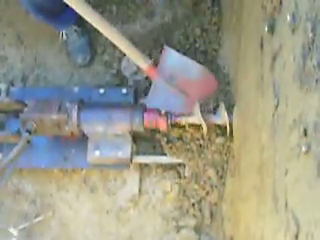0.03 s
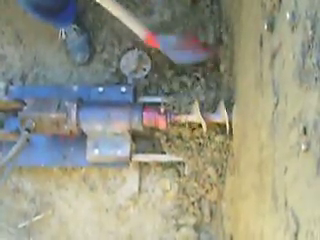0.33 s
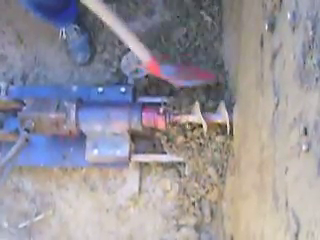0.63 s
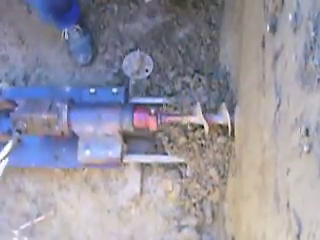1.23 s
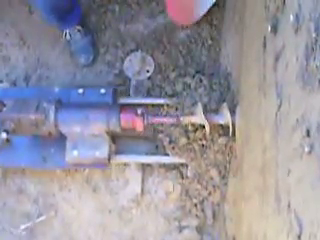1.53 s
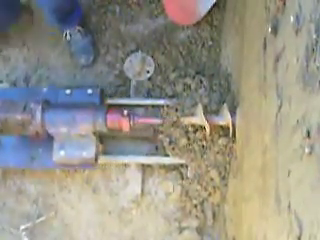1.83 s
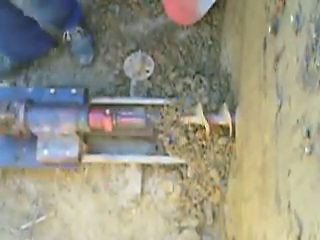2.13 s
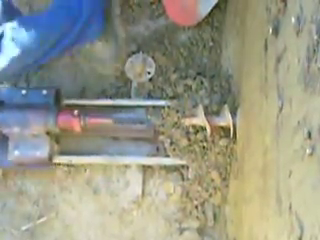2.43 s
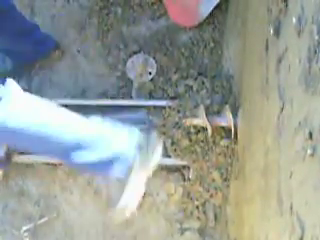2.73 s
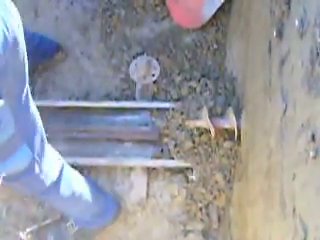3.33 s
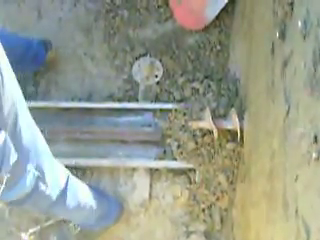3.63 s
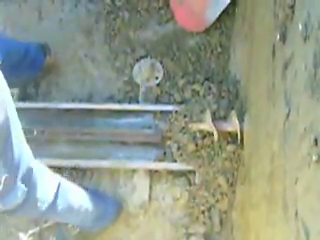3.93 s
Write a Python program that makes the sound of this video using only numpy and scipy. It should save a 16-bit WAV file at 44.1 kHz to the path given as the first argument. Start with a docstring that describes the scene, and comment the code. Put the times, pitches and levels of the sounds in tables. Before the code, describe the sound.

A steel carriage scrapes along gritty rails while a small engine thuds steadily underneath. Sharp, gritty knocks, probably from a shovel and the rig, ring the metal frame from the start, thinning out by 2 seconds. Jerky scraping begins around 1 second and swells from 2.5 into one loud grind. A rough, wavering moan joins from 3 seconds until the end at 4, overloading the close, dull microphone.

```python
"""A small engine thuds steadily beside a boring rig in an earth pit. Gritty knocks, probably of a
shovel and the rig's own parts, ring its steel frame. Then its carriage is drawn back along soil-covered
rails, first in jerks, then in one loud grinding scrape with a stick-slip moan.
The scrape overloads the close, narrow-band microphone."""
import sys
import numpy as np
from scipy import signal
from scipy.fft import rfft, irfft
from scipy.io import wavfile
from scipy.ndimage import uniform_filter1d

SR = 44100
rng = np.random.default_rng(int(sys.argv[2]) if len(sys.argv) > 2 else 0)


def pcm_store(signal):
    """Save signal as 16-bit PCM."""
    levels = np.round(np.clip(np.atleast_2d(signal), -1, 1) * 32767)
    wavfile.write(sys.argv[1], SR, levels.astype(np.int16).T)


N = 176400

# frame registers: low_hz, high_hz
HUM_HZ, GROAN_HZ, CLANG_HZ, GRIT_HZ = (222, 367), (410.4, 736), (774, 1373), (1370, 4360)


def undb(db):
    """Decibels to gain."""
    return 10 ** (np.asarray(db) / 20)


def curve(rows, column=1):
    """Table column, interpolated linearly in time."""
    rows = np.array(rows)
    return np.interp(np.arange(N) / SR, rows[:, 0], rows[:, column])


def walk(rate_hz):
    """Smooth random wander, spread 1."""
    step = int(SR / rate_hz)
    y = uniform_filter1d(np.repeat(rng.standard_normal(N)[:N // step + 1], step), step)[:N]
    return y / y.std()


def coloured(spectrum):
    """Noise of the given spectral shape, rms 1."""
    hz, db = np.array(spectrum).T
    bins_hz = np.fft.rfftfreq(N, 1 / SR)
    gain = undb(np.interp(np.log(bins_hz + 1), np.log(hz), db))
    y = irfft(rfft(rng.standard_normal(N)) * gain, N)
    return y / y.std()


def band(x, edges_hz):
    """Band-pass between two edges."""
    return signal.sosfilt(signal.butter(4, edges_hz, "band", fs=SR, output="sos"), x)


def engine():
    """Low exhaust thud and drone, with mechanical clatter that swells twice a cycle."""
    # engine speed: time_s, cycle_hz
    speed = [(0, 34.6), (.22, 32.2), (.55, 31.75), (1.5, 31.25), (1.95, 30.5), (2.55, 32.2), (3.1, 30.85),
             (3.65, 30.3), (4, 32)]
    # exhaust envelope: time_s, gain_db
    exhaust = [(0, -1.5), (1, -4), (2.7, -3), (2.95, -8.5), (3.35, -8.5), (3.7, -3), (4, -4.5)]
    # exhaust partials: cycle_multiple, level_db
    partials = [(1, -35.5), (2, -27.5), (3, -37.5), (4, -45.5), (6, -57.5), (7, -52), (8, -56), (9, -48),
                (10, -48)]
    # clatter spectrum: freq_hz, relative_db
    clatter_shape = [(30, 3), (110, -4.5), (300, -3), (390, -5), (520, -8), (780, -14), (1000, -6),
                     (1300, -27), (2700, -20.5), (4200, -24.5)]
    # drone at five times the cycle rate: time_s, rms_db
    drone_levels = [(0, -45.5), (.8, -46.5), (1.3, -39), (1.75, -38), (2.08, -45), (2.35, -36.5),
                    (2.75, -40), (3.2, -46.5), (4, -45)]
    waver_db, clatter_db, clatter_depth = 2.6, -35.5, 0.44
    phase = 2 * np.pi * np.cumsum(curve(speed)) / SR
    thud = sum(np.sqrt(2) * undb(db + waver_db * walk(5)) * np.cos(k * phase) for k, db in partials)
    clatter = coloured(clatter_shape) * (1 + clatter_depth * np.cos(2 * phase))
    drone = np.sqrt(2) * undb(curve(drone_levels)) * np.cos(5 * phase)
    return thud * undb(curve(exhaust)) + drone + undb(clatter_db) * clatter


def frame(force, edges_hz, struck):
    """The steel rings in one register, struck or rubbed; white force keeps its rms."""
    # frame and rail resonances: pitch_hz, width_hz, rubbed_db, struck_db
    modes = [(291.8, 16.7, 0, 0), (461, 71, -4, -1), (504.3, 36, -1.5, 1.5), (552.5, 35, 1, 1),
             (657, 110, -1.5, -2), (842, 140, -0.5, -14.5), (927, 77, 3, -4), (1041, 72, 1.5, 3.5),
             (1160, 69, -2.5, -12.5), (1424, 60, 0, -3), (1581, 210, 3, 1), (1841, 290, -7.5, -4),
             (2177, 210, -2, -0.5), (2496, 120, 1, 0), (2765, 325, 0.5, 3), (2960, 97, -6.5, 2.5),
             (3145, 130, -6, 0), (3380, 140, -4.5, 1), (3697, 280, -0.5, 4.5), (4120, 140, -11.5, -1.5)]
    t = np.arange(SR // 4) / SR
    ring = np.zeros(len(t))
    for pitch_hz, width_hz, rubbed_db, struck_db in modes:
        if edges_hz[0] < pitch_hz < edges_hz[1]:
            gain = undb(struck_db if struck else rubbed_db) * width_hz
            ring += gain * np.exp(-np.pi * width_hz * t) * np.cos(2 * np.pi * pitch_hz * t)
    ring = band(ring, edges_hz)
    return signal.fftconvolve(force, ring / np.linalg.norm(ring))[:N]


def knocks():
    """Each blow bites through soil, crushes grit, rings the frame and lets crumbs settle."""
    # blows on the frame: start_s, hum_db, groan_db, clang_db, grit_db, decay_s
    blows = [(.001, -30, -28, -27.5, -30, 0.032), (0.033, -33, -9, -8, -29, 0.0037),
             (.236, -48, -36, -24.5, -31.5, 0.016), (0.284, -34, -30.5, -32.5, -28.5, 0.036),
             (0.309, -44, -28, -27, -24, 0.024), (.329, -31, -15.5, -11.5, -15, 0.011),
             (0.363, -40, -36, -27, -24, 0.0073), (0.388, -39, -28, -28, -20.5, 0.0094),
             (0.4545, -15, -15, -12.5, -8.5, 0.011), (0.474, -24, -24.5, -21.5, -31, 0.012),
             (0.571, -40, -34, -34, -29, .012), (.597, -34, -36, -38, -28, 0.0066),
             (.642, -14, -11, -12, -11, 0.0083), (0.693, -42, -37, -36.5, -33, 0.033),
             (.745, -39, -33.5, -46, -31, .015), (.766, -50, -35, -34, -32.5, 0.015),
             (0.794, -36, -24, -18.5, -19.5, 0.0078), (0.84, -24, -15.5, -12.5, -7, 0.0039),
             (0.883, -28, -25, -27, -19.5, 0.0092), (0.922, -24, -20.5, -23.5, -15.5, 0.0068),
             (0.938, -23, -34, -30.5, -24, .014), (1.003, -30, -31, -30, -28, 0.012),
             (1.037, -34, -37, -32, -30, 0.031), (1.2306, -51, -44, -27, -22, 0.011),
             (1.2942, -19, -18, -25, -14.5, 0.0077), (1.3468, -37, -29, -19.5, -21.5, 0.0086),
             (1.375, -24, -15.5, -18, -13.5, 0.0067), (1.4208, -36, -29, -19.5, -19, 0.035),
             (1.4865, -25, -26, -26, -14.5, 0.011), (1.5447, -33, -28, -34, -26, 0.014),
             (1.6292, -23, -35, -19.5, -23, 0.008), (1.7177, -41, -27, -20.5, -20, 0.0078),
             (1.826, -20, -26, -22.5, -21, 0.016), (1.9076, -43, -39, -32, -22.5, 0.0067),
             (1.939, -47, -33.5, -24.5, -22.5, 0.012), (2.055, -33, -17, -32, -28, 0.0077),
             (2.111, -51, -21.5, -21, -23, .012), (2.1331, -30.5, -26.5, -23, -22.5, 0.0061),
             (2.4135, -33.5, -23.5, -29, -14.5, 0.0049)]
    attack_s, contact_s = 0.0015, 0.0013
    settle_db, settle_s = -26.5, 0.036
    registers = (HUM_HZ, GROAN_HZ, CLANG_HZ, GRIT_HZ)
    envelopes = np.zeros((len(registers), N))
    age_s = np.arange(SR // 4) / SR
    bite = 1 - np.exp(-age_s / attack_s)
    crumbs = undb(settle_db) * np.exp(-age_s / settle_s)
    for start_s, *levels_db, decay_s in blows:
        first = int(start_s * SR)
        crush = np.exp(-np.maximum(age_s - contact_s, 0) / decay_s)
        envelopes[:, first:first + len(age_s)] += undb(levels_db)[:, None] * (crush + crumbs) * bite
    return sum(frame(envelope * rng.choice([-1, 1], N), edges_hz, struck=True)
               for envelope, edges_hz in zip(envelopes, registers))


def grains(rate_hz=5000, spread_db=3):
    """Soil crushed under steel: dense clicks of uneven size, rms 1."""
    clicks = (rng.random(N) < rate_hz / SR) * rng.choice([-1, 1], N)
    y = clicks * undb(spread_db * np.minimum(rng.exponential(size=N), 4))
    return y / y.std()


def chatter(half_width_hz=34):
    """Steel sticks and slips on the rails: a rough, narrow moan of wandering pitch."""
    # stick-slip moan: time_s, pitch_hz, level_db
    slip = [(3.05, 560, -29), (3.17, 528, -23), (3.27, 530, -20), (3.35, 590, -18.5), (3.41, 478, -19.5),
            (3.49, 505, -16.5), (3.56, 475, -15.5), (3.68, 530, -29), (3.8, 580, -19), (3.9, 575, -17.5),
            (4, 530, -23)]
    lowpass = signal.butter(2, half_width_hz, fs=SR, output="sos")
    grip = signal.sosfilt(lowpass, grains() + 1j * grains())
    moan = np.real(grip * np.exp(2j * np.pi * np.cumsum(curve(slip)) / SR))
    sliding = np.arange(N) / SR > slip[0][0]
    return sliding * moan / moan.std() * undb(curve(slip, column=2))


def scrape():
    """The carriage jerks and judders over gritty rails, ringing the frame and rumbling the ground."""
    # scrape envelope: time_s, hum_db, groan_db, clang_db, grit_db
    levels = [(.6, -51.5, -50, -46.5, -66), (.98, -63, -37, -37, -38), (1.12, -67, -42.5, -45, -45.5),
              (1.28, -40.5, -34.5, -37.5, -40), (1.395, -38, -25, -31, -34.5), (1.43, -29, -26, -23.5, -23),
              (1.52, -34.5, -28.5, -30.5, -26.5), (1.66, -25, -32, -31, -30.5),
              (1.8, -32.5, -27.5, -30, -28), (1.89, -30.5, -35, -37, -39), (2.08, -29, -33.5, -36.5, -35),
              (2.28, -35, -32.5, -30, -34), (2.52, -30.5, -23.5, -23.5, -24),
              (2.66, -39, -23.5, -21, -22.5), (2.76, -35.5, -21.5, -16.5, -18.5),
              (2.88, -39, -19, -17.5, -17), (3.06, -34, -23.5, -19, -16.5), (3.2, -27.5, -15.5, -20, -19),
              (3.35, -27.5, -18.5, -19, -18.5), (3.48, -36.5, -17.5, -18, -22.5),
              (3.72, -29.5, -19, -19, -20.5), (3.89, -36.5, -18, -17.5, -20), (4, -45, -22, -21.5, -21)]
    # uneven sliding, strong while the carriage creeps: time_s, spread_db
    jerkiness = [(1, 3.5), (2.2, 3.4), (2.8, -0.16), (4, 0)]
    judder_hz, judder_db, jerk_hz = 54.82, 0.54, 27.977
    rumble_hz, rumble_db = (80, 270), -17.5  # level relative to the clang register
    uneven_db = judder_db * walk(judder_hz) + curve(jerkiness) * walk(jerk_hz)
    # the heavy lowest resonance follows the jerks only in part
    jerk_shares = ((HUM_HZ, 0.3), (GROAN_HZ, 1), (CLANG_HZ, 1), (GRIT_HZ, 1))
    rails = np.zeros(N)
    for column, (edges_hz, share) in enumerate(jerk_shares, start=1):
        force = grains() * undb(share * uneven_db + curve(levels, column))
        rails += frame(force, edges_hz, struck=False)
    rumble = band(grains(), rumble_hz)
    return rails + rumble / rumble.std() * undb(rumble_db + curve(levels, column=3))


def scene():
    """Engine, knocks, scrape and chatter in mono."""
    return (engine() + knocks() + scrape() + chatter())[None]


def record(dry):
    """Narrow-band microphone; its offset makes loud troughs clip first."""
    dull_hz, edge_hz, top_hz = 3706, 4266, 16000
    bias, clip_level, knee = -0.2375, 0.72, 20
    dulled = signal.sosfilt(signal.butter(10, dull_hz, fs=SR, output="sos"), dry)
    biased = signal.sosfilt(signal.cheby1(10, .5, edge_hz, fs=SR, output="sos"), dulled) + bias
    clipped = biased / (3.5 + np.abs(biased / clip_level) ** knee) ** (1 / knee)
    top_cut = signal.ellip(8, .2, 70, top_hz, fs=SR, output="sos")
    return signal.sosfilt(top_cut, clipped - bias) + bias


dry = scene()
out = record(dry)
pcm_store(out)
```